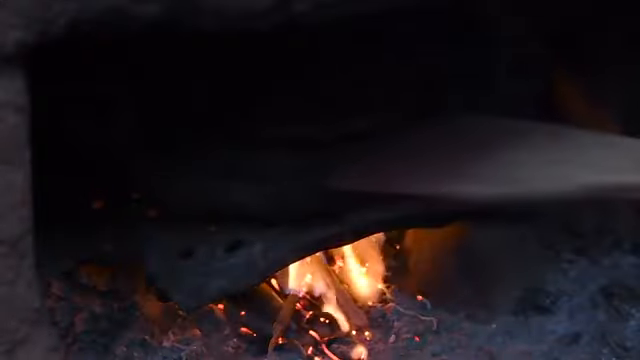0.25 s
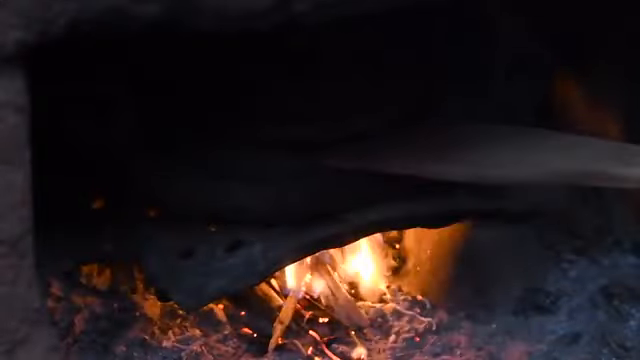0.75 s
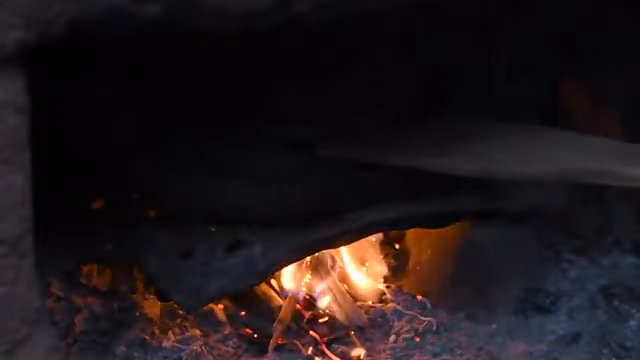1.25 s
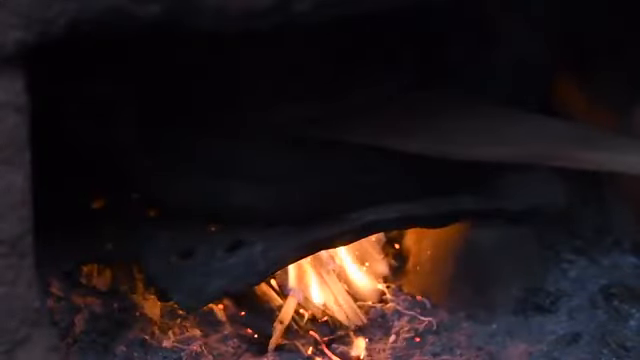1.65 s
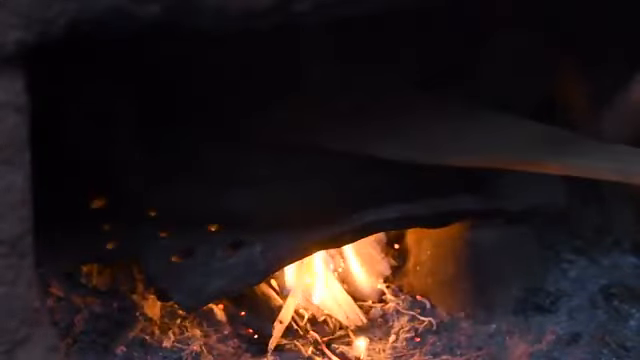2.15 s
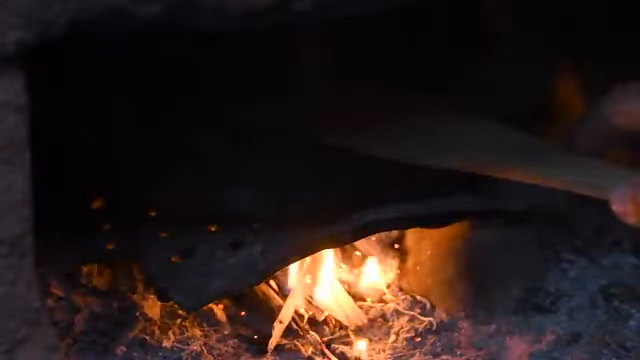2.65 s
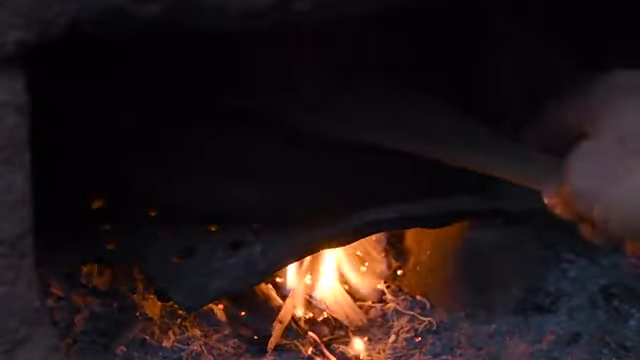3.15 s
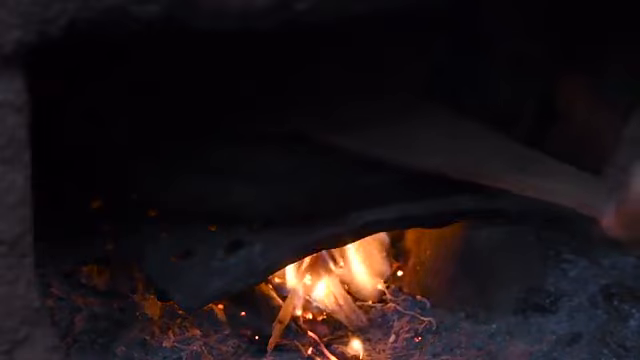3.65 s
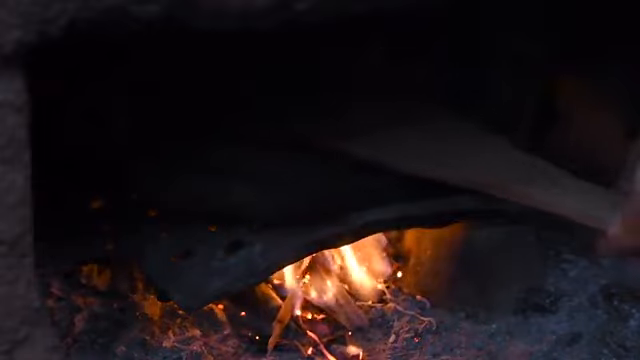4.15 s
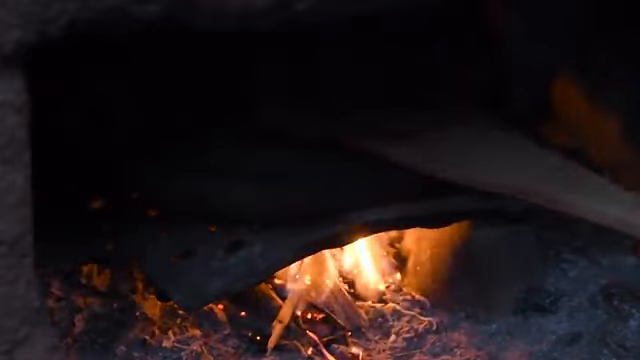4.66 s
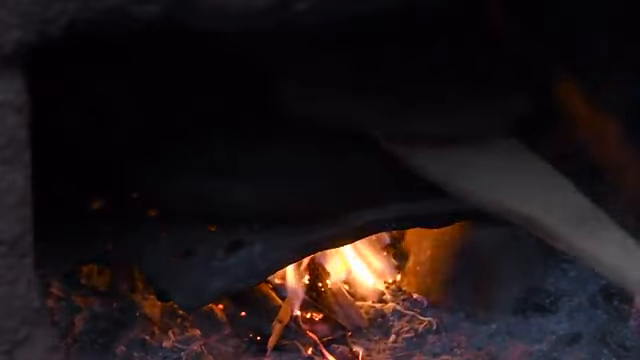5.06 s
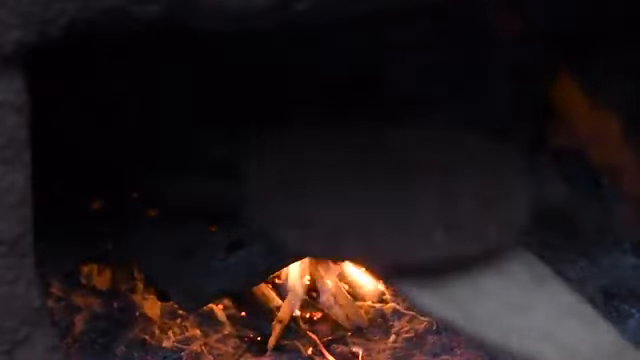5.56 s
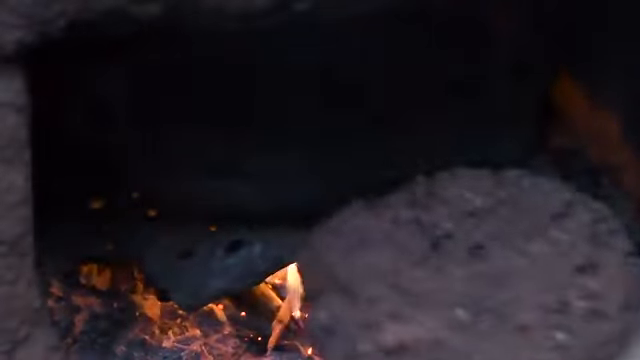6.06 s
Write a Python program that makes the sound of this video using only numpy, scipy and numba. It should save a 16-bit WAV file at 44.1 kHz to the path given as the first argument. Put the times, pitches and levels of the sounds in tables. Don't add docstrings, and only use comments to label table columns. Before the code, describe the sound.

Close bright rasping and sharp crust cracks as a wooden blade works across a hot iron plate, far road noise rumbling beneath.

```python
import sys
import numpy as np
from scipy import signal
from scipy.fft import rfft, irfft, next_fast_len
from scipy.io import wavfile
from scipy.ndimage import uniform_filter1d, map_coordinates
from numba import njit

SR = 44100
rng = np.random.default_rng(int(sys.argv[2]) if len(sys.argv) > 2 else 0)


def level_to_linear(level):
    exponent = np.asarray(level, float) / 20
    return 10 ** exponent


def generate_wav(signal):
    frames = np.transpose(np.atleast_2d(signal))
    scaled = np.clip(frames, -1, 1) * 32767
    pcm = np.round(scaled).astype(np.int16)
    wavfile.write(sys.argv[1], SR, pcm)


N = 278561

# frequency in Hz, density in dB per Hz.
GRIT_SPECTRUM = [(900, -18.5), (1500, -13), (2000, -10.5), (4500, -9), (6000, -7), (9000, -3.5),
                 (10500, -7.5), (12300, -6), (13300, -10), (14200, -29)]
# centre in Hz, width in Hz, level in dB.
FLAT_MODES = [(3523, 330, 2.5), (5214, 370, 2), (6990, 240, -2), (10740, 350, -7)]


def unit(x):
    return x / np.sqrt(np.mean(x ** 2) + 1e-20)


def along(points, hz):
    f, v = np.transpose(points)
    return np.interp(np.log(hz + 1), np.log(f + 1), v)


def curves(rows):
    s, *cols = np.transpose(rows)
    return [np.interp(np.arange(N) / SR, s, c) for c in cols]


def wobble(rate_hz):
    knots = rng.standard_normal(int(N * rate_hz / SR) + 4)
    return map_coordinates(knots, [np.arange(N) * rate_hz / SR])


def filtered(x, response):
    m = next_fast_len(N + SR // 2)
    return irfft(rfft(x, m) * response(np.fft.rfftfreq(m, 1 / SR)), m)[..., :N]


def ringing(modes):
    def response(f):
        return sum((-1) ** k * level_to_linear(db) * 1j * f * w / (c * c - f * f + 1j * f * w)
                   for k, (c, w, db) in enumerate(modes))
    return response


def paired(two, alike):
    def mid_side(hz):
        turn = np.arccos(np.clip(along(alike, hz), -1, 1)) / 2
        return np.array([np.cos(turn), np.sin(turn)])
    mid, side = filtered(two, mid_side)
    return np.array([mid + side, mid - side])


def noise(spectrum, grain=1.):
    white = grain * rng.standard_normal((2, N))
    return unit(filtered(white, lambda hz: level_to_linear(along(spectrum, hz))))


def hiss():
    # frequency in Hz, density in dB per Hz.
    hiss_spectrum = [(1470, -13), (2500, -4.5), (4680, -6), (8550, -6.5), (14400, -7), (15500, -13)]
    return level_to_linear(-69.5) * noise(hiss_spectrum)


def traffic():
    # time in seconds, level in dB.
    flow = [(0, -47), (1, -47.5), (1.7, -46), (2.8, -47.5), (3.7, -46.5), (4.4, -46.5), (5.3, -46),
            (5.8, -48), (6.3, -45)]
    # frequency in Hz, density in dB per Hz.
    deep_spectrum = [(11, -36), (18, -5), (54, 0), (110, -4.5), (140, -48), (240, -120)]
    rumble_spectrum = [(38, -20), (65, -1.5), (92, -1.5), (113, 2.5), (156, -5.5), (268, -11.5),
                       (339, -24.5), (371, -20.5), (399, -27.5), (450, -25), (580, -51), (990, -120)]
    roar_spectrum = [(180, -24), (300, -3), (346, -5), (437, -11.5), (660, -12), (717, -14), (1100, -16),
                     (1800, -25.5), (2070, -27), (5000, -41.5), (6500, -45), (11000, -120)]
    # frequency in Hz, left-right likeness 0-1.
    far_alike = [(30, 0.98), (200, 0.92), (280, 0.86), (340, 0.19), (420, 0.72), (700, 0.75), (1400, 0.72),
                 (3000, 0.51)]
    # time in seconds, pitch in Hz, level in dB.
    engine_notes = [
        [(1.4, 112, -53), (1.65, 117.5, -55), (2, 121.7, -52.5), (2.4, 132, -48), (2.8, 139.4, -47.5),
         (3.15, 145.4, -47.5), (3.3, 144, -85)],
        [(4.9, 263.5, -64), (5.3, 263, -64), (5.55, 262, -52), (5.8, 263, -68)],
        [(3.2, 592, -77), (3.6, 576.6, -72), (4.2, 572.5, -72), (4.5, 570, -71)],
        [(0, 60.8, -87), (.6, 60.83, -50.5), (1.7, 58.6, -53.5), (2.5, 57.5, -54.5), (2.9, 55.6, -61)],
    ]
    t = np.arange(N) / SR
    flow_db, = curves(flow)
    swell_db = flow_db - flow_db.mean()
    deep_db = -50.5 + 1.3 * swell_db + 1.8 * wobble(3.32)
    rumble_db = flow_db + 0.94 + 0.43 * wobble(4.23)
    roar_db = -59.5 + 0.19 * swell_db - 0.37 * t + 0.34 * wobble(2.36)
    road = level_to_linear(deep_db) * noise(deep_spectrum)
    road = road + level_to_linear(rumble_db) * noise(rumble_spectrum)
    road = road + level_to_linear(roar_db) * noise(roar_spectrum)
    road = paired(road, far_alike)
    for note in engine_notes:
        hz, db = curves(note)
        sounding = (t > note[0][0]) & (t < note[-1][0])
        level = level_to_linear(db + 2 + 2.4 * wobble(9))
        phase = 2 * np.pi * np.cumsum(hz * (1 + 0.00912 * wobble(14))) / SR
        road = road + sounding * level * np.sin(phase)
    return road


def knocks():
    # start in seconds, level in dB, pitch in Hz, 60 dB decay in seconds.
    plate_rings = [(.382, -50, 907, 0.096), (.46, -56.5, 1300, 0.32), (1.336, -49, 1124, 0.14),
                   (1.357, -43, 467, 0.22), (1.359, -66, 1540, 0.11), (1.36, -56, 720, 0.05),
                   (1.39, -52, 979, 0.23), (1.41, -59, 615, .12), (2.112, -68, 1430, 0.054),
                   (4.043, -56, 1310, 0.14), (4.198, -47, 1460, 0.094), (3.841, -40, 2487, 0.054),
                   (3.89, -52, 9360, 0.051), (3.905, -40, 9340, 0.035), (4.237, -42, 758, 0.062),
                   (4.238, -57, 1170, 0.048), (4.249, -47, 1526, 0.095)]
    out, t = np.zeros(N + SR), np.arange(SR // 4) / SR
    for s, db, hz, t60_s in plate_rings:
        shaking = np.cumsum(rng.normal(0, 0.14, len(t)))
        envelope = level_to_linear(db - 60 * t / t60_s) * (1 - np.exp(-t / 0.00086))
        out[round(s * SR):][:len(t)] += envelope * np.sin(2 * np.pi * hz * t + shaking)
    return out[:N]


def snaps():
    # start in seconds, peak in dB, blade ring in dB over the peak, 60 dB decay in seconds.
    crusts = [(0.3813, -51, 13, 0.024), (0.5291, -54, -20, 0.018), (0.7862, -38.5, -13, 0.013),
              (0.806, -22, -17, 0.018), (0.8693, -36, 0, 0.01), (0.9027, -37, -20, 0.02),
              (1.3565, -15, -6.5, 0.022), (1.4663, -22.5, 3, 0.015), (1.5214, -35, -8, 0.012),
              (1.8883, -30.5, -6, 0.018), (2.17, -35, -19, 0.013), (2.2911, -43, -22, 0.018),
              (2.3038, -32.5, -31, 0.011), (2.4417, -42, -2, 0.019), (2.4792, -48, -19, 0.022),
              (2.532, -42, 3.5, 0.031), (2.7136, -46, -12, 0.014), (2.771, -24.5, -28, 0.021),
              (2.9352, -37, -18, 0.011), (3.465, -35.5, -7, 0.019), (3.4927, -36.5, -7, 0.021),
              (3.84, -33.5, -12, 0.023), (3.8905, -52, -19, 0.015), (3.9077, -49, -10, 0.011),
              (4.1746, -36.5, -2, 0.019), (4.2374, -31, 4.5, 0.014), (4.356, -48, -23, 0.017),
              (4.678, -53, -10, 0.018), (5.6016, -50, -18, 0.018)]
    # start in seconds, peak in dB.
    grain_ticks = [
        (1.4742, -33),
        (3.755, -25),
        (3.822, -32),
        (4.0473, -24),
        (4.2258, -24),
        (4.2685, -27.5),
    ]
    # centre in Hz, width in Hz, level in dB.
    edge_modes = [(2160, 560, -8), (4040, 400, 1), (4960, 1400, -4), (7080, 1040, 2.5), (9760, 1020, 1.5),
                  (12450, 3600, -4.5)]
    crack, blows = np.zeros((2, N + SR)), np.zeros((2, N + SR))
    t = np.arange(SR // 10) / SR
    for s, db, ring_db, t60_s in crusts + [(s, db + 7.0, -40, .006) for s, db in grain_ticks]:
        envelope = level_to_linear(-60 * t / max(t60_s, .004)) * (1 - np.exp(-t / 0.0023))
        burst = envelope * rng.standard_normal((2, len(t)))
        i = round(s * SR)
        crack[:, i:][:, :len(t)] += level_to_linear(db + 4.5) * burst
        blows[:, i:][:, :len(t)] += level_to_linear(db + ring_db + 9.5) * burst
    crack, blows = crack[:, :N], blows[:, :N]

    def bare(hz):
        return ringing(edge_modes)(hz) + level_to_linear(along(GRIT_SPECTRUM, hz) - 6.5)
    lowest = filtered(blows, ringing([(2100, 350, 0)]))
    overtones = level_to_linear(-6.5) * filtered(blows, ringing(FLAT_MODES))
    return filtered(crack, bare) + lowest + overtones


def effort():
    # start in seconds, length in seconds, grit in dB at start and at end, ring in dB.
    pushes = [(0.377, 0.11, -69, -62, 5.5), (0.495, .04, -69, -67, -2), (0.523, 0.29, -62.5, -74, -1.5),
              (0.779, 0.12, -63, -64.5, 2.5), (1.367, 0.1, -45, -54.5, 1.5),
              (1.513, 0.12, -58.5, -69.5, -2), (1.648, 0.14, -75, -72, -7), (1.96, .13, -84, -66, -5),
              (2.203, .11, -79, -67, -2), (2.445, 0.092, -74, -68.5, -0.5), (2.703, .16, -56, -58, -2.5),
              (2.857, 0.25, -56, -57.5, -0.5), (3.253, 0.25, -66.5, -56, -0.5),
              (3.507, 0.14, -61.5, -64.5, -7), (3.653, 0.104, -67.5, -54.5, -0.5),
              (3.747, 0.0734, -52.5, -53, -3), (3.927, 0.11, -63, -61, -1), (4.032, 0.035, -43.5, -40, -6),
              (4.09, 0.041, -44.5, -49, -4), (4.176, 0.095, -50, -47.5, -3.5), (4.287, 0.046, -63, -70, -2),
              (4.335, 0.16, -62.5, -69.5, 2.5)]
    # start in seconds, length in seconds, peak grit in dB, share 0-1 when fastest, ring in dB.
    jabs = [(0.876, 0.11, -67, 0.28, 1), (1.297, .1, -49.5, 0.63, 1.5), (1.77, 0.22, -61.5, 0.46, 6.5),
            (2.091, 0.068, -41.5, 0.47, -8.5), (2.161, 0.024, -55.5, 0.47, 2), (2.313, 0.14, -53, 0.44, -4),
            (2.507, 0.2, -63.5, 0.28, 0), (2.858, 0.18, -51, 0.56, -5), (2.676, 0.064, -62.5, 0.57, -1.5),
            (3.085, 0.18, -59.5, 0.56, -2), (3.867, 0.063, -50.5, 0.82, -13)]
    grip_s, stop_db_per_s, speed_power = 0.013, 900, 2.73
    t, shapes = np.arange(N) / SR, []
    for s, span_s, from_db, to_db, ring_db in pushes:
        level = level_to_linear(np.interp(t, [s, s + span_s], [from_db, to_db]))
        grip = np.clip((t - s) / grip_s, 0, 1)
        stop = level_to_linear(-stop_db_per_s * np.maximum(t - s - span_s, 0))
        shapes.append((ring_db, level * grip * stop))
    for s, span_s, db, share, ring_db in jabs:
        fastest_s = s + np.clip(share, .05, .95) * span_s
        speed = abs(np.sin(np.pi * np.interp(t, [s, fastest_s, s + span_s], [0, .5, 1])))
        shapes.append((ring_db, level_to_linear(db) * speed ** speed_power))
    grit, ring = np.zeros(N), np.zeros(N)
    for ring_db, shape in shapes:
        grit += shape ** 2
        ring += (level_to_linear(ring_db) * shape) ** 2
    return np.sqrt(grit), np.sqrt(ring)


@njit
def gliding(x, hz, width_hz, rate):
    y, r = np.zeros_like(x), np.exp(-np.pi * width_hz / rate)
    for c in range(x.shape[0]):
        for i in range(2, x.shape[1]):
            feedback = 2 * r * np.cos(2 * np.pi * hz[i] / rate) * y[c, i - 1] - r * r * y[c, i - 2]
            y[c, i] = x[c, i] - x[c, i - 2] + feedback
    return y


def patchy(x, depth_db):
    z = signal.stft(x, nperseg=512)[2]
    field = uniform_filter1d(rng.standard_normal(z.shape[1:]), size=7, axis=0)
    field = uniform_filter1d(field, size=9, axis=1)
    return signal.istft(z * level_to_linear(depth_db * unit(field)), nperseg=512)[1][:, :N]


def scraping():
    # time in seconds, lift (-1 skimming, 0 flat, 1 tilted),
    # air gap (0 shut, 1 open), gap resonance in Hz.
    hold = [(.4, 0.33, 0.84, 2640), (.5, -0.63, 0.63, 2700), (.62, -0.57, .1, 2900), (.92, -0.75, .3, 2600),
            (1.35, -0.15, 0.15, 2620), (1.87, 0.000053, 0.52, 2660), (2.12, 0, 0.42, 2670),
            (2.38, 0.09, 0.29, 3140), (2.55, 0.35, 0.47, 2670), (2.75, 0.78, 0.24, 2900),
            (2.92, 0.18, 0.19, 2800), (3.07, 0.89, 0.92, 2470), (3.19, 0.69, 0.83, 2950),
            (3.45, 1, 0.91, 2470), (3.62, 0.74, 0.84, 2660), (3.82, 0.88, 0.54, 2680),
            (4.08, 0.75, 0.49, 3000), (4.4, 0.38, 0.54, 2910)]
    # centre in Hz, width in Hz, level in dB.
    bending_modes = [(1906, 154, 5.5), (2257, 310, 2.5)]
    tilted_modes = [(4010, 130, -1.5), (4980, 98, -1), (7030, 200, -6), (9350, 320, -7.5)]
    skimming_modes = [(3980, 58, 2.5), (5270, 200, -15), (6760, 240, -5), (10300, 450, 0)]
    lift, opening, gap_hz = curves(hold)
    lift = np.clip(lift, -1, 1)
    chatter, shaking = np.array(effort()) * level_to_linear(1.33 * wobble(45))
    grain = unit(level_to_linear(1.42 * wobble(350)))
    jolts = grain * rng.standard_normal((5, 2, N))

    def ring(db, x, modes):
        power = np.mean(abs(ringing(modes)(np.linspace(1, SR / 2, 4000))) ** 2)
        return filtered(shaking * level_to_linear(db) * x, ringing(modes)) / np.sqrt(power)
    bending_db = -0.5 - 10 * opening - 3 * abs(lift)
    blade = ring(bending_db, jolts[0], bending_modes)
    blade = blade + ring(0.11, np.sqrt(1 - abs(lift)) * jolts[1], FLAT_MODES)
    blade = blade + ring(0.17, np.sqrt(np.maximum(lift, 0)) * jolts[2], tilted_modes)
    blade = blade + ring(2.2, np.sqrt(np.maximum(-lift, 0)) * jolts[4], skimming_modes)
    gap_db = -16 + 18.5 * opening
    gap = chatter * level_to_linear(gap_db) * unit(gliding(jolts[3], gap_hz, 290.0, SR))

    spikes = 1 + 6.5 * (rng.random(N) < 160 / SR)
    rasp = noise(GRIT_SPECTRUM, grain * spikes)
    treble = filtered(rasp, lambda hz: 1 / (1 + (5500 / (hz + 1)) ** 4))
    rasp = rasp - (1 - level_to_linear(-2 * opening ** 2)) * treble
    return patchy(chatter * level_to_linear(0.14) * rasp + blade + gap, depth_db=1.68)


def scene():
    # frequency in Hz, left-right likeness 0-1.
    near_alike = [(500, 0.95), (2500, 0.95), (4500, 0.53), (8000, 0.68), (14000, 1)]
    # frequency in Hz, lead of the left port in radians.
    near_lead = [(2500, 0.066), (5000, 0.6), (8000, 0.99), (11000, 1.54), (14000, 2.2)]

    def lead(hz):
        return np.exp(.5j * along(near_lead, hz) * np.array([[1], [-1]]))
    griddle = paired(knocks() + snaps() + scraping(), near_alike)
    return traffic() + filtered(griddle, lead)


def low_pass(x):
    return signal.sosfilt(signal.butter(12, 15700, fs=SR, output="sos"), x)


def record(dry):
    ports = (dry + hiss()) * level_to_linear(np.array([[-.7], [.7]]))
    mix = filtered(ports, lambda hz: hz < 15050)
    return low_pass(mix)


dry = scene()
out = record(dry)
generate_wav(out)
```